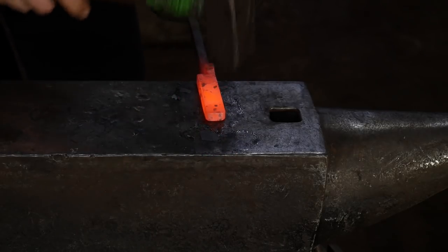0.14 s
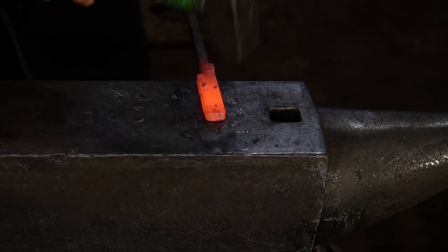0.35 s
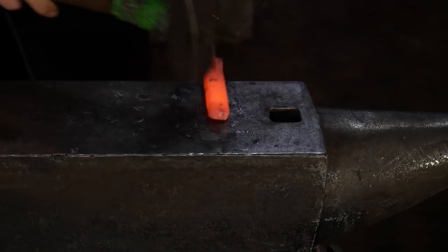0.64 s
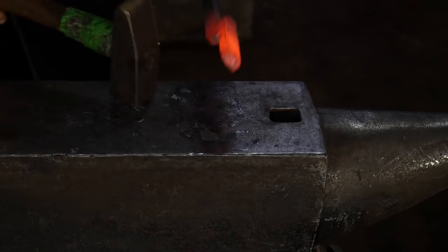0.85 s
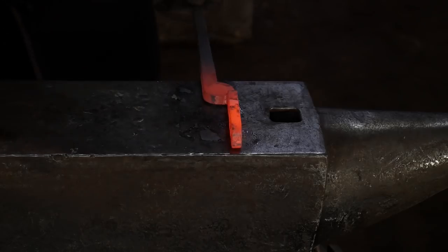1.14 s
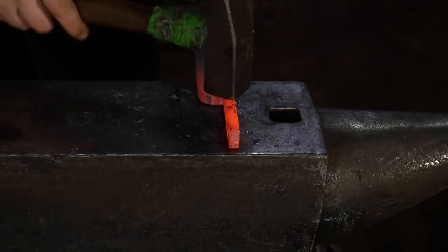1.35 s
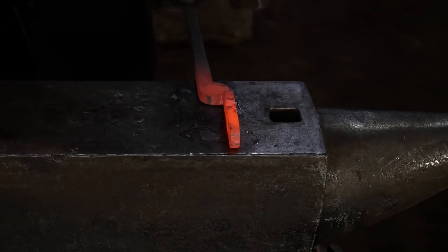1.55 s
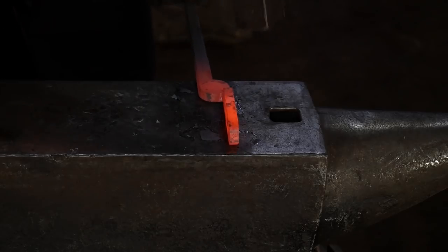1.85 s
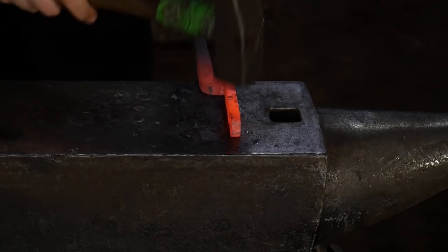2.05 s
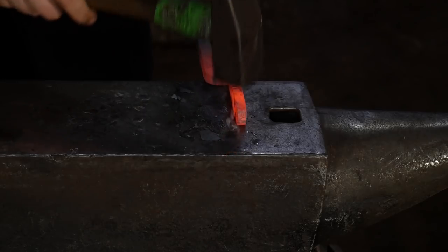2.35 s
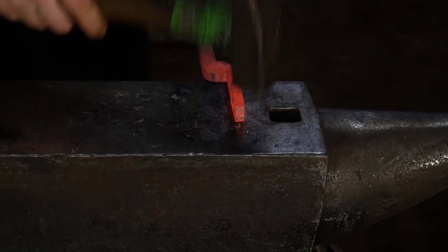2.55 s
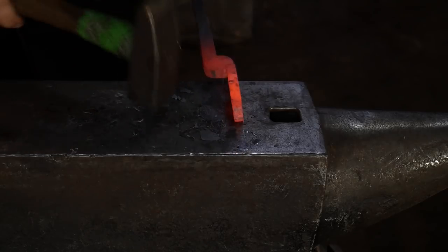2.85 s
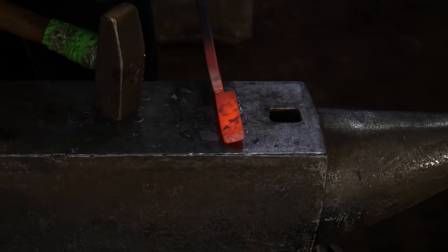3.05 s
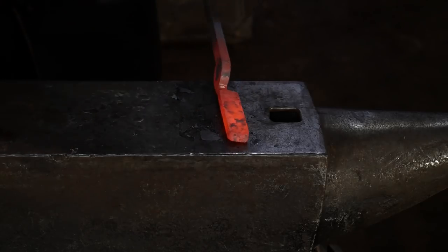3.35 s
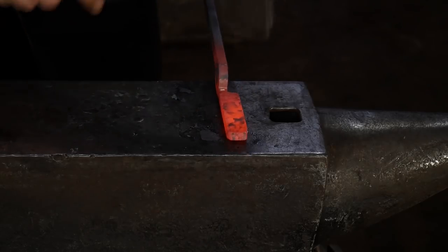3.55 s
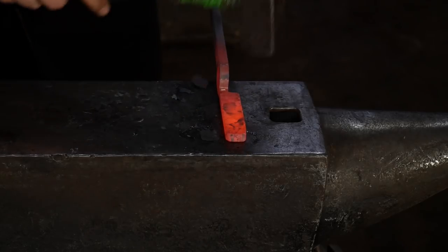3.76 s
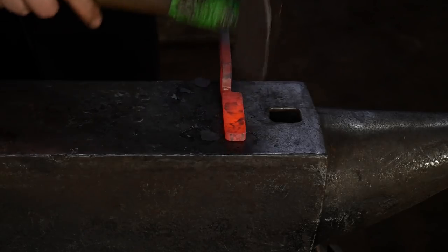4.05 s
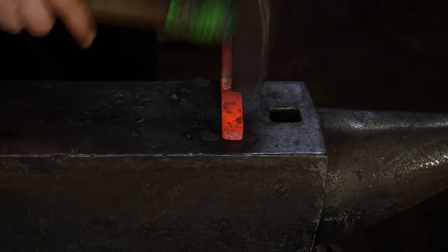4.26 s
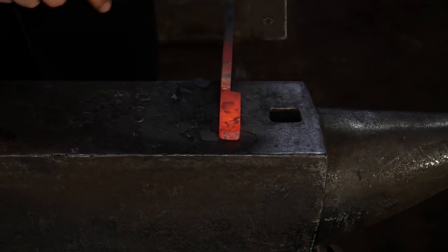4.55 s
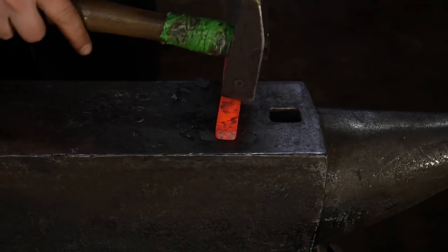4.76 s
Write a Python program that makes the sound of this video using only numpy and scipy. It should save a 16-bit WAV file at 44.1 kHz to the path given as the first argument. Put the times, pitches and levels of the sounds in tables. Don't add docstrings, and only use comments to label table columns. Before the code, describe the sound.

A hand hammer works a hot bar on an anvil about a metre from a single microphone. Hard, crisp blows come roughly every third of a second, each with a scaly crack and short high ring. Twice the hammer bounces on the bare anvil face, ringing clearer. Blows on the bar's edge are duller and softer. A low forge blower murmurs faintly below; the small shop adds quick echoes and a short tail.

```python
import sys
import numpy as np
from scipy import signal
from scipy.io import wavfile
from scipy.ndimage import uniform_filter1d

SR = 44100
rng = np.random.default_rng(int(sys.argv[2]) if len(sys.argv) > 2 else 0)


def log_audio(samples):
    frames = np.atleast_2d(samples).T
    limited = np.clip(frames, -1, 1)
    pcm = np.round(limited * 32767).astype(np.int16)
    wavfile.write(sys.argv[1], SR, pcm)


def gain_from_db(level_db):
    decades = np.asarray(level_db, float) / 20
    return 10 ** decades


N = 216619
LEAD = 4096
SPAN = 24000

BLOWS = [(-0.045, "glancing", -6, -23.5, -62, -51.5), (0.2451, "glancing", -4, -23, -43.5, -44.5),
         (0.5583, "flat", -2, -22, -40.5, -46), (0.7971, "face", 0.1, -26.5, -34.5, -39.3),
         (0.8782, "face", -10.5, -33.5, -45.4, -48.5), (1.018, "touch", -25.5, -28, -49, -64.5),
         (1.0568, "rebound", -37, -47.5, -83, -80.5), (1.3791, "turned", -7, -23, -48, -75),
         (1.7262, "turned", -6.5, -28, -54.5, -60), (2.0276, "edge", -8.5, -24, -49, -57.5),
         (2.3083, "edge", -9, -21.5, -53.5, -59), (2.6183, "edge", -7, -17.5, -47.5, -59),
         (2.8953, "face", 0.9, -27.5, -38.5, -42), (3.0278, "face", -4.5, -27.5, -41.5, -39),
         (3.0855, "face", -17.5, -41.5, -57.5, -71.5), (3.6557, "flat", -3, -23.5, -42, -49),
         (3.9715, "glancing", -3, -25, -44, -57), (4.3197, "flat", -1, -20.5, -31.5, -44),
         (4.6945, "glancing", 0.5, -20, -29.5, -41.5), (4.7363, "rebound", -24.5, -35, -48, -50)]


def band(x, hz, width_hz):
    return signal.lfilter(*signal.iirpeak(min(hz, .45 * SR), hz / width_hz, fs=SR), x)


def level(x, db):
    return x * gain_from_db(db) / np.sqrt(np.mean(x ** 2))


def curve(rows):
    s, db = np.transpose(rows)
    return gain_from_db(np.interp(np.arange(N) / SR, s, db))


def fade(t, t60):
    return np.exp(-np.log(1000) * t / t60)


def place(rows, times):
    out = np.zeros(LEAD + N + SPAN)
    for row, s in zip(rows, times):
        i = LEAD + int(round(s * SR))
        out[i:i + len(row)] += row
    return out


def ring(modes, scatter_db, at=0.):
    hz, db, t60 = np.transpose(modes)[:, :, None]
    t = np.arange(SPAN) / SR
    waves = gain_from_db(db) * fade(t - at, t60) * np.exp(2j * np.pi * hz * t)
    chance = rng.standard_normal((len(BLOWS), 2, len(modes)))
    not_first = np.arange(len(modes)) > 0
    share = gain_from_db(scatter_db * chance[:, 0] * not_first)
    phase = np.exp(.4j * chance[:, 1])
    return ((share * phase) @ waves).imag


def sizzle():
    t = np.arange(N) / SR
    start_s, end_s = 1.917, 2.18
    rise_db_per_s, fall_db_per_s = 104, 128.5
    held_db = np.interp(t, (start_s, end_s), (-64, -66))
    slopes_db = rise_db_per_s * np.maximum(start_s - t, 0) + fall_db_per_s * np.maximum(t - end_s, 0)
    return gain_from_db(held_db - slopes_db) + gain_from_db(-86)


def shop():
    # freq_hz, density_db (per Hz)
    roar_spectrum = [(22, -26.5), (45, -3), (64, -5), (97, 0.5), (160, -24.5), (270, 0.5), (380, -9.5),
                     (490, -4.5), (650, -11.5), (1020, -17), (1840, -26), (5000, -34), (16000, -44.5)]
    # time_s, level_db
    blower_level = [(0.0, -60.5), (0.89, -57.5), (1.05, -60.5), (3.02, -59), (3.21, -60.5), (4.91, -58)]
    hz, db = np.transpose(roar_spectrum)
    roar = 0
    for f in 30 * 2 ** np.arange(0, 9.1, .5):
        steps = np.repeat(rng.standard_normal(N // 3000 + 1), 3000)
        flicker = uniform_filter1d(steps, 3000)[:N]
        noise = band(band(rng.standard_normal(N), f, f / 2), f, f / 2)
        roar = roar + gain_from_db(np.interp(np.log(f), np.log(hz), db) + 0.5 * flicker) * noise
    motor_hz, motor_width_hz = 60.5, 5
    hum = band(band(rng.standard_normal(N), motor_hz, motor_width_hz), motor_hz, motor_width_hz)
    hiss = band(rng.standard_normal(N), 9500., 8300.)
    return level(roar, 1.3) * curve(blower_level) + level(hum, -66) + level(hiss, 0) * sizzle()


def room(x):
    # freq_hz, level_db, t60_s
    tail = [(138, -33, 0.057), (232, -26.5, 0.59), (430.6, -47.5, 0.4), (980, -40.5, 1), (2020, -45, 0.47),
            (4230, -33, 0.64), (8000, -41, 0.43), (14000, -48.5, 0.12)]
    hz, db, t60 = np.transpose(tail)
    t = np.arange(SPAN + SPAN // 2) / SR
    response = 0
    for f in 90 * 2 ** np.arange(0, 7.6, .5):
        here_db = np.interp(np.log(f), np.log(hz), db)
        here_t60 = np.interp(np.log(f), np.log(hz), t60)
        noise = band(rng.standard_normal(len(t)), f, f / 3.1)
        response = response + gain_from_db(here_db) * fade(t, here_t60) * noise
    response = response * (1 - fade(t, 0.014))
    return signal.fftconvolve(x, response)[:len(x)]


def echoes(push_track):
    # delay_s, gain
    surfaces = [(.00305, .45), (.005, .28), (.0021, -.12)]
    dull = signal.lfilter([.15], [1, -.85], push_track)
    return sum(gain * np.roll(dull, int(delay * SR)) for delay, gain in surfaces)


def thumps():
    t = np.arange(8192) / SR
    wave = fade(t, 0.054) * np.sin(2 * np.pi * 96 * t)
    below_force_db = -38.5
    return place([gain_from_db(row[2] + below_force_db) * wave for row in BLOWS], [row[0] for row in BLOWS])


def ticks():
    # start_s, level_db, colour_hz
    clicks = [
        (2.071, -34, 4620),
        (3.370, -50.5, 4520),
        (3.402, -57, 2920),
        (3.476, -70.5, 3004),
        (3.521, -56.5, 8820),
        (3.544, -68, 8000),
        (4.547, -66.5, 9100),
    ]
    t = np.arange(800) / SR
    bursts = rng.standard_normal((len(clicks), 800)) * fade(t, 0.012)
    rows = [gain_from_db(db) * band(band(burst, hz, hz), hz, hz) for burst, (_, db, hz) in zip(bursts, clicks)]
    return place(rows, [row[0] for row in clicks])


def shimmer():
    spot, life = rng.random((2, 80))
    modes = np.transpose([3800 + 11700 * spot, -16 - 7 * spot, .2 + .22 * life])
    return ring(modes, 5.5, .03)


def spray():
    noise = rng.standard_normal((len(BLOWS), SPAN))
    return .6 * band(noise, 6500., 9000.) * fade(np.arange(SPAN) / SR - .03, .3)


def stand():
    # freq_hz, level_db, t60_s
    stand_modes = [(475, 0, .035), (255, -6, .03), (655, -2, .03), (1000, -6, .025), (1290, -8, .02),
                   (1560, -8, .025), (483, -21, .4), (515, -31, .3)]
    return ring(stand_modes, 1.5)


def chips():
    # freq_hz, level_db, t60_s
    chip_modes = [(5890, -2, 0.0058), (4357, -8.5, 0.015), (7410, 2, 0.0035)]
    return ring(chip_modes, 3.)


def crack(db, hz, treble_db):
    t = np.arange(2048) / SR
    burst = rng.standard_normal(len(t)) * (fade(t, 0.014) + 0.034 * fade(t, 0.094))
    middle = signal.sosfilt(signal.butter(2, (3300, 7500), "band", fs=SR, output="sos"), burst)
    top = signal.sosfilt(signal.butter(2, (8000, 12500), "band", fs=SR, output="sos"), burst)
    hiss = 2.01 * middle + 2.5 * gain_from_db(treble_db) * top
    chatter = 5.86 * band(burst, hz, 450.)
    return gain_from_db(db) * np.array([hiss, chatter])


def metal(head_db, anvil_db, face_db, overtone_db, bar_db, shimmer_db, spray_db):
    # freq_hz, level_db, t60_s
    head_modes = [(3634, 0, .26), (4142, -22, .35), (3350, -24, .3), (8624, -27, .3), (2762, -27, .2)]
    waist_modes = [(3468, -2, .34), (3447, -10, .12), (3352, -13, .28), (4300, -17, .25), (8035, -22, .35),
                   (2762, -19, .25)]
    face_modes = [(5106, 0, .21), (1458, -8, .12), (5914, -22, .2), (6519, -24, .35), (6705, -21, .17),
                  (7101, -22, .27), (7612, -24, .28), (7950, -29, .2), (2480, -22, .1), (12040, -30, .09),
                  (12965, -34, .2), (8624, -24, .2), (10850, -32, .3), (12300, -33, .3), (13440, -34, .2),
                  (4300, -24, .25)]
    overtone_modes = [(10220, 3, .3), (10412, 2, .3), (10852, -1, .3), (10022, -4, .14), (11070, -6, .12),
                      (11790, -12, .3), (9088, -9, .3), (8035, -12, .3)]
    bar_modes = [(6928, 4, .3), (9598, 3, .3), (12250, 2, .3), (12410, 2, .33), (12515, -2, .38),
                 (13055, -3, .33), (13440, -5, .3), (13590, 2, .23), (13740, -6, .3), (13985, -5, .23),
                 (14320, -9, .2), (14910, -9, .2), (15060, -12, .28), (7472, -3, .25)]
    parts = [(head_db, ring(head_modes, 2.5, .03)),
             (anvil_db, ring(waist_modes, 1., .03)),
             (face_db, ring(face_modes, 2.5, .03)),
             (overtone_db, ring(overtone_modes, 2., .03)),
             (bar_db, ring(bar_modes, 3., .03)),
             (shimmer_db, shimmer()),
             (spray_db, spray())]
    ringing = sum(gain_from_db(db)[:, None] * part for db, part in parts)
    return ringing * (1 - fade(np.arange(SPAN) / SR, 0.005))


def pulse(db, hz):
    t = (np.arange(512) - 64) / SR * hz * 6.59
    return gain_from_db(db) * 2.0 * (1 - t) * np.exp(-(1 - t) ** 2 / 2 * np.where(t < 0, .8, 1.))


def blows():
    knocks = {"flat": (1694, 4492, -25.5, 2.5, -13), "glancing": (1760, 4399.5, -26.5, 1.5, -14),
              "turned": (1396, 5003, -16.5, 3.5, -12.5), "edge": (1450, 5901, -22.5, -7.5, -13),
              "face": (2100, 5000, -31.5, -5.5, -15), "touch": (3900, 8600, -33, -5, -18),
              "rebound": (2300, 4600, -29, -2.5, -27.5)}
    after = {"flat": (-10, -29, -47, -27, -25.5), "glancing": (-5, -17.5, -46, -28, -25),
             "turned": (5, -19.5, -43, -30.5, -15.5), "edge": (-1.7, -31, -54.5, -35.5, -30.5),
             "face": (2, -32, -45, -32.5, -46.5), "touch": (4.5, -28, -59, -34, -20),
             "rebound": (-7, -25.5, -30, -22.5, -19.5)}
    s, force_db, crack_db, head_db, anvil_db = np.transpose([row[:1] + row[2:] for row in BLOWS])
    contact_hz, crack_hz, thud_db, treble_db, room_db = np.transpose([knocks[row[1]] for row in BLOWS])
    face_db, overtone_db, bar_db, shimmer_db, spray_db = np.transpose([after[row[1]] for row in BLOWS])

    octaves_per_db = 0.0449
    pulse_hz = contact_hz * 2 ** (octaves_per_db * force_db)
    push = np.array([pulse(*row) for row in zip(force_db, pulse_hz)])

    cracks = [crack(*row) for row in zip(crack_db, crack_hz, treble_db)]
    hiss, chatter = np.transpose(cracks, (1, 0, 2))
    knock = gain_from_db(force_db + thud_db + 4)[:, None] * stand()
    knock[:, :2048] += hiss
    chip = gain_from_db(crack_db + 4)[:, None] * chips()
    chip[:, :2048] += chatter
    ringing = metal(head_db, anvil_db, anvil_db + face_db, head_db + overtone_db,
                    crack_db + bar_db, crack_db + shimmer_db, crack_db + spray_db)

    early = s - 68 / SR
    cheeks = signal.ellip(3, 3.5, 17, 2500, fs=SR, output="sos")
    push_track = signal.sosfilt(cheeks, place(push, early))
    direct = push_track + echoes(push_track) + place(knock + chip + ringing, s)
    send = gain_from_db(room_db)[:, None]
    wet = place(send * push, early) + place(send * (knock + .4 * chip + .16 * ringing), s)
    return direct, wet


def scene():
    direct, wet = blows()
    small = ticks()
    hits = direct + small + room(wet + small)
    hits = signal.sosfilt(signal.butter(2, 260, "high", fs=SR, output="sos"), hits)
    mono = (hits + thumps())[LEAD:LEAD + N] + shop()
    ends = gain_from_db(-37.5) * mono + gain_from_db(-24) * band(mono, 13000., 8000.) + gain_from_db(-28) * band(mono, 60., 120.)
    side = ends * level(uniform_filter1d(rng.standard_normal(N), size=150), 0)
    return np.array([mono + side, mono - side])


def top_cut(x):
    return signal.sosfilt(signal.butter(12, 17110, fs=SR, output="sos"), x)


def record(dry):
    drive = 1.17
    rounded = np.tanh(drive * dry) / drive
    soft = signal.sosfilt(signal.butter(2, 12800, fs=SR, output="sos"), rounded)
    cut = signal.sosfilt(signal.ellip(8, .2, 70, 16700, fs=SR, output="sos"), soft)
    return top_cut(cut)


dry = scene()
out = record(dry)
log_audio(out)
```